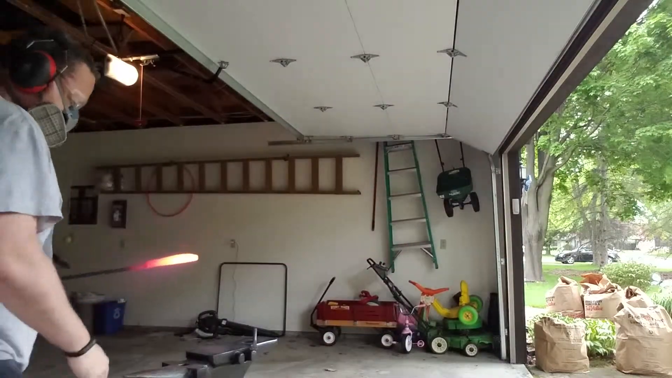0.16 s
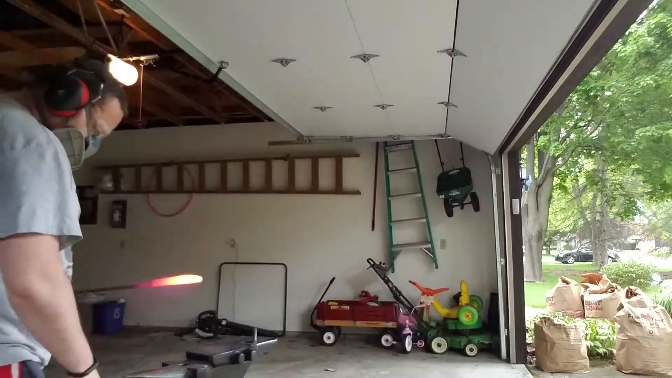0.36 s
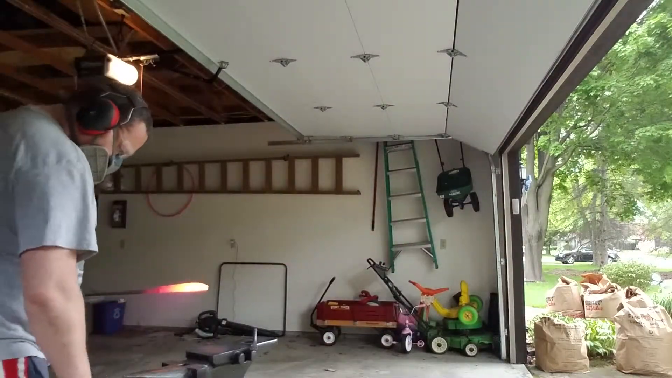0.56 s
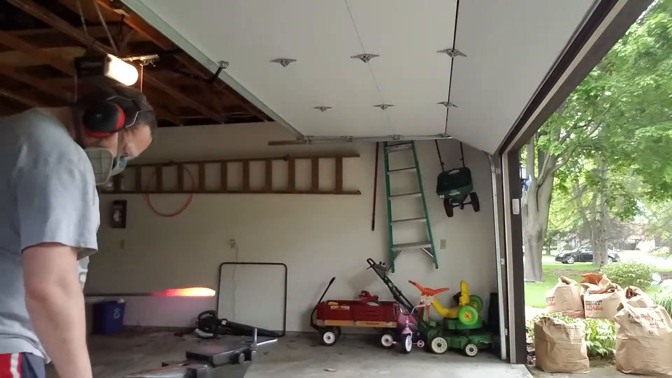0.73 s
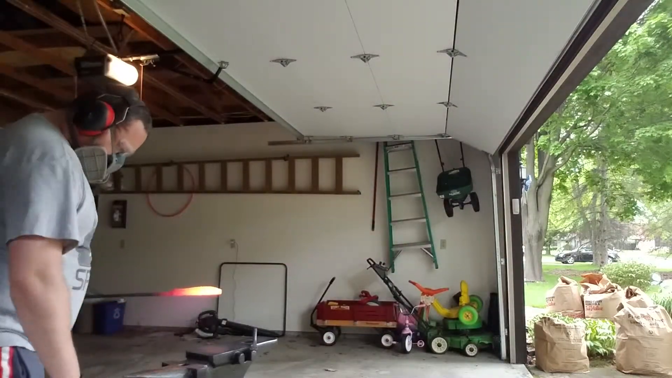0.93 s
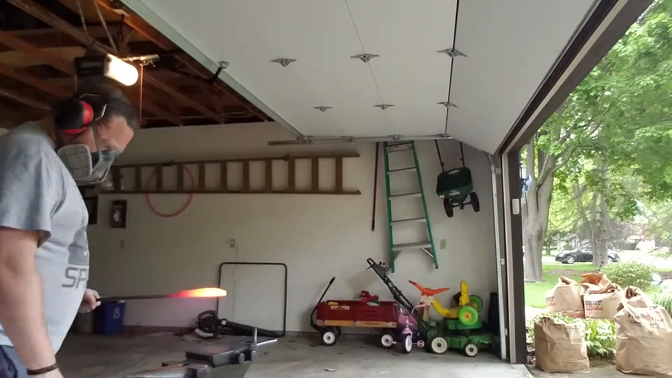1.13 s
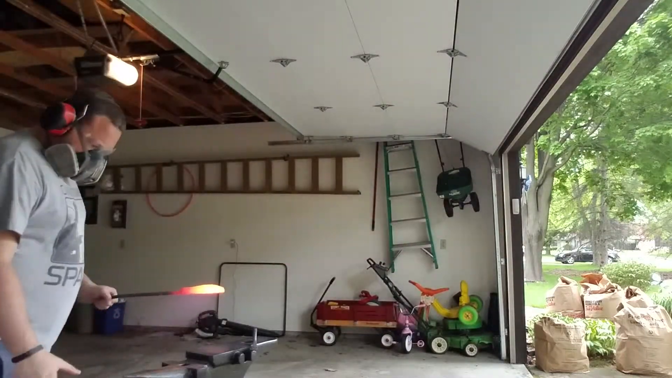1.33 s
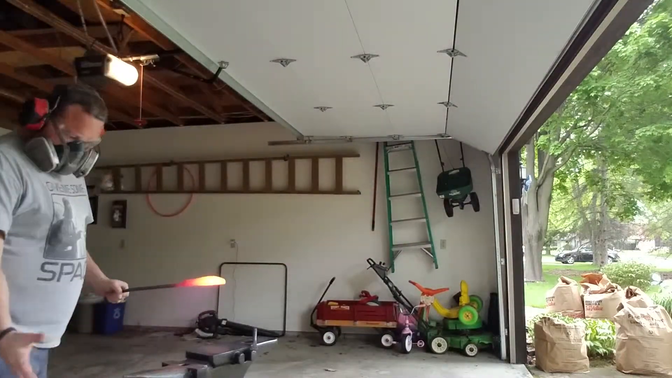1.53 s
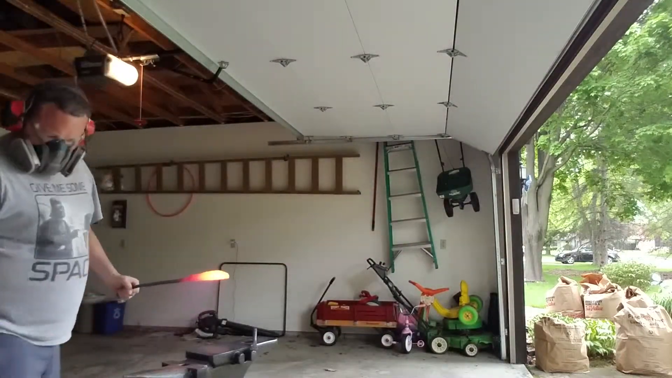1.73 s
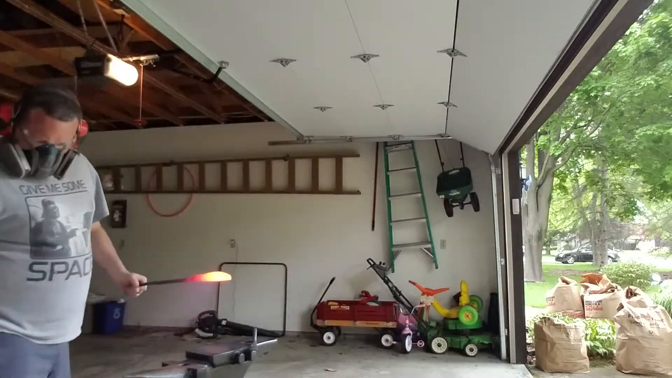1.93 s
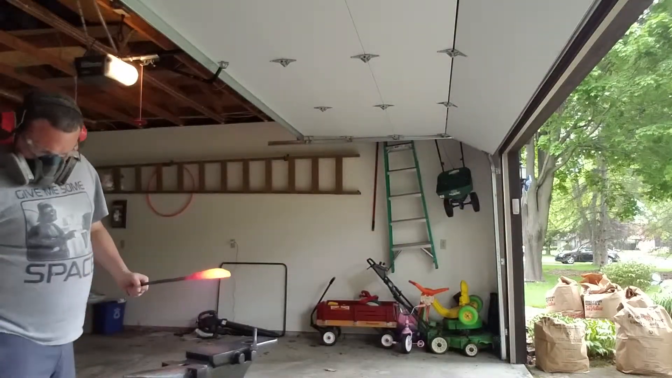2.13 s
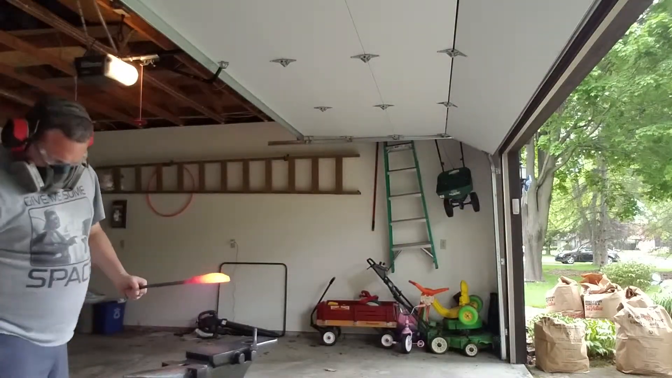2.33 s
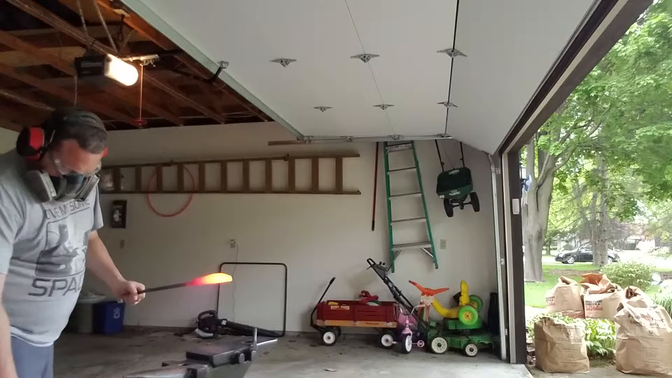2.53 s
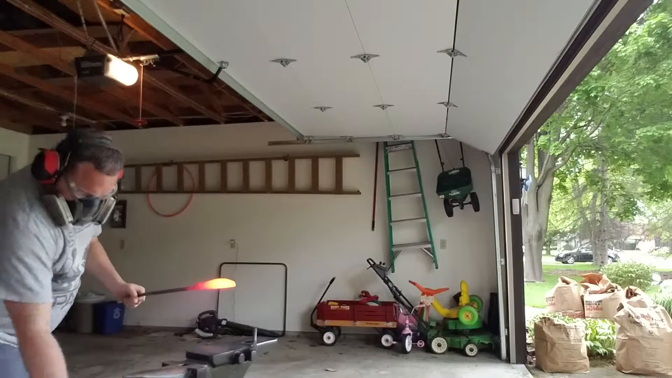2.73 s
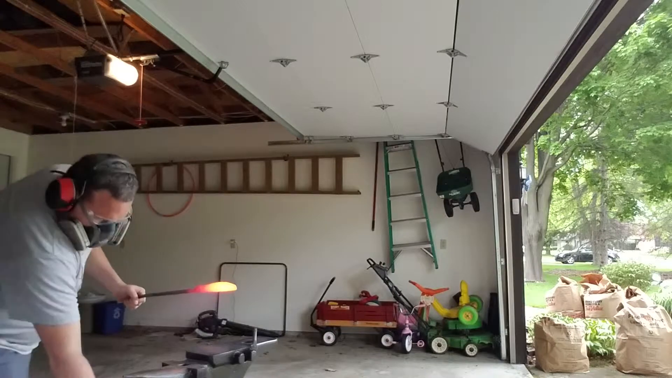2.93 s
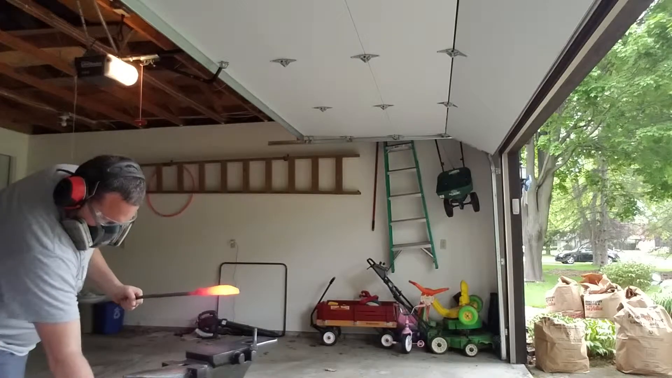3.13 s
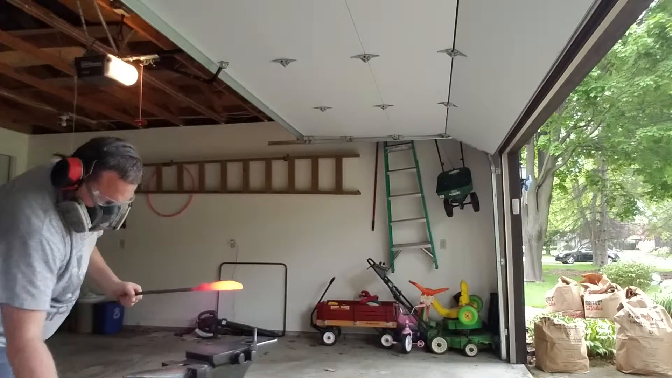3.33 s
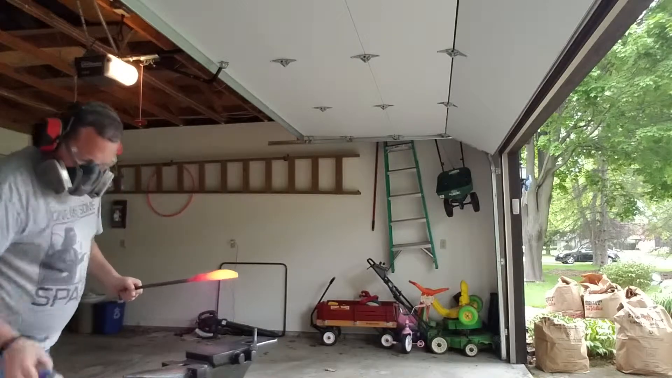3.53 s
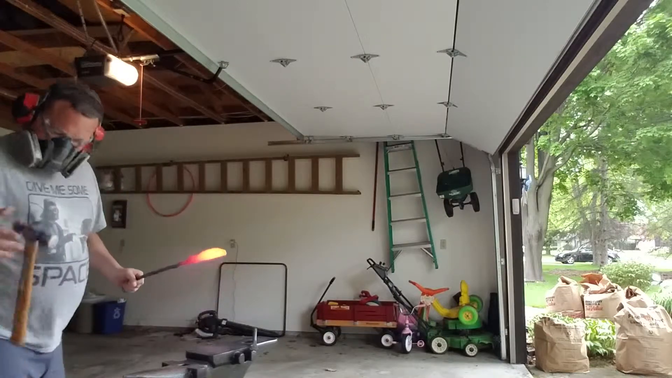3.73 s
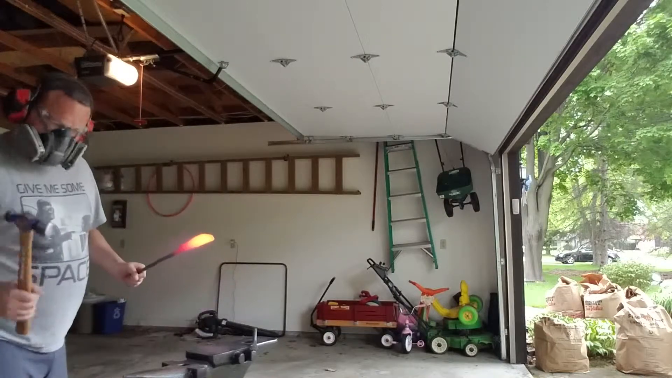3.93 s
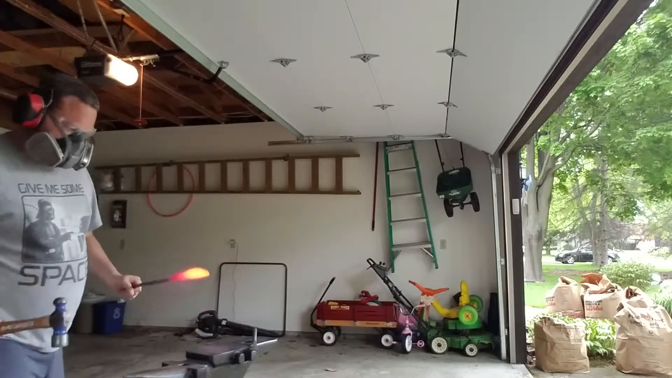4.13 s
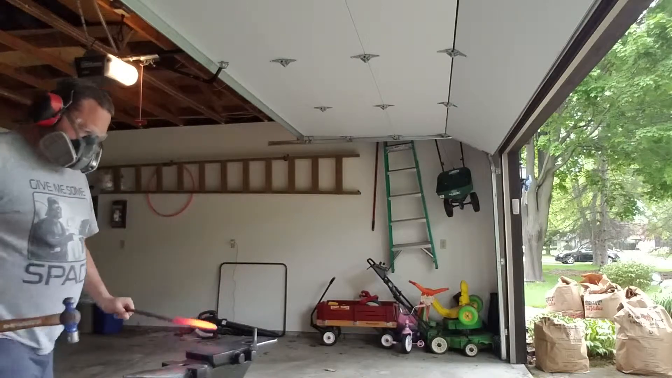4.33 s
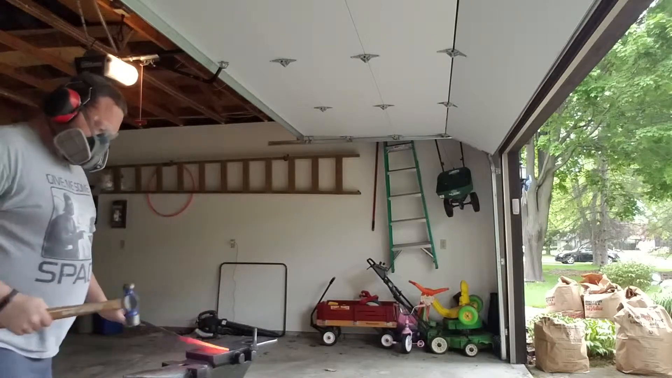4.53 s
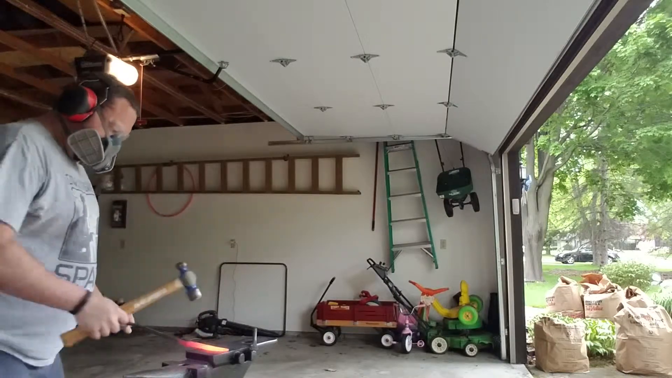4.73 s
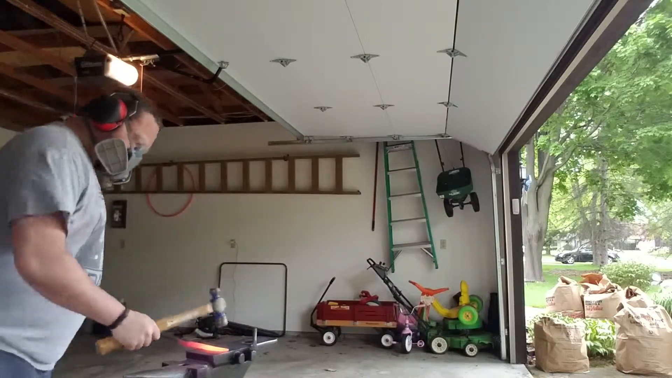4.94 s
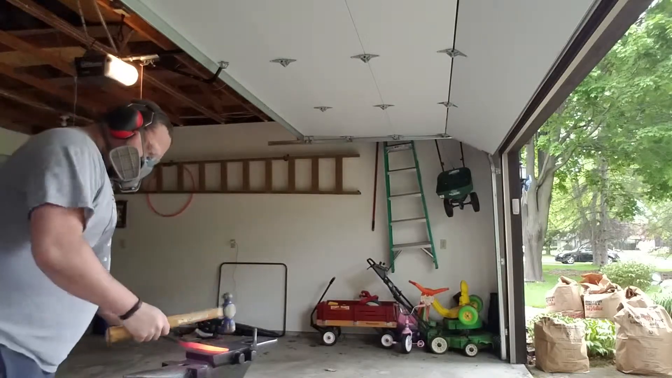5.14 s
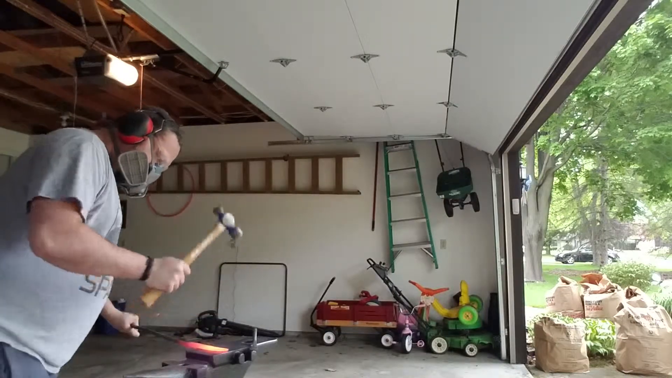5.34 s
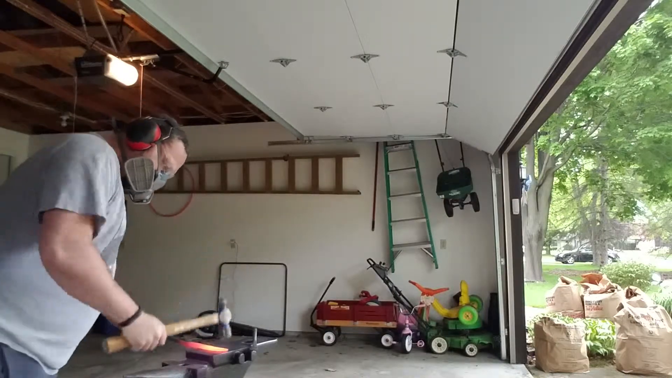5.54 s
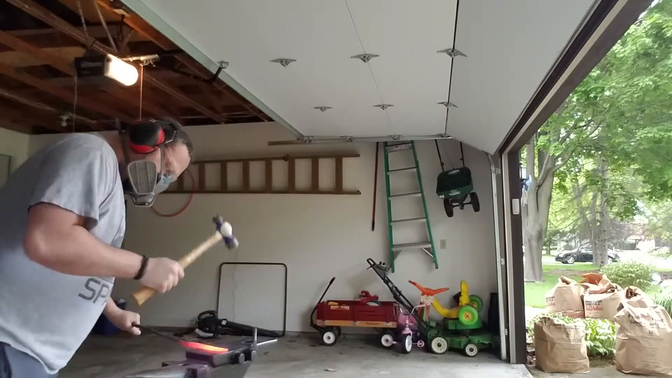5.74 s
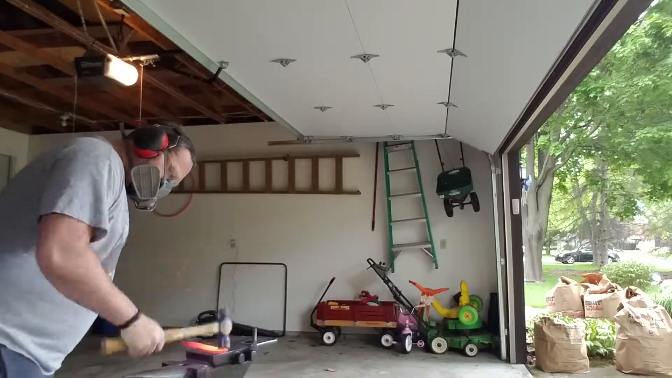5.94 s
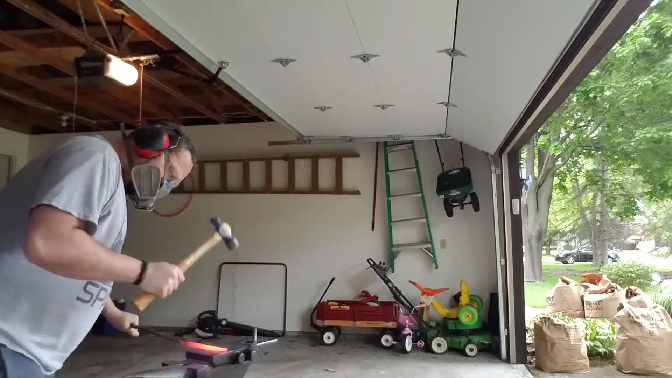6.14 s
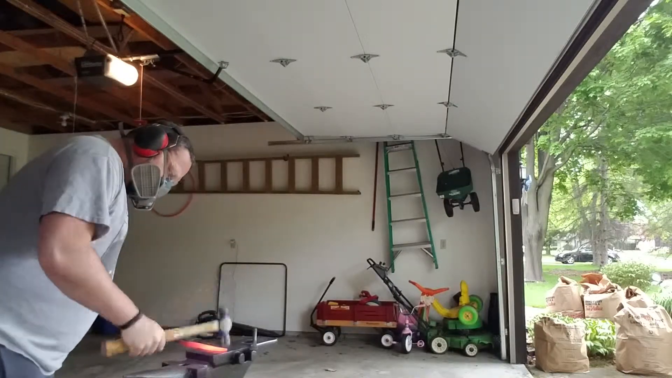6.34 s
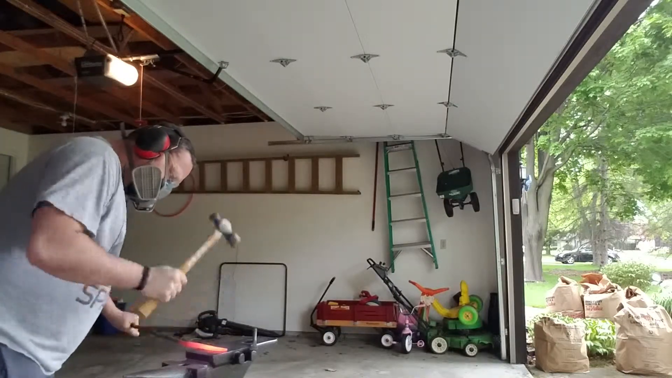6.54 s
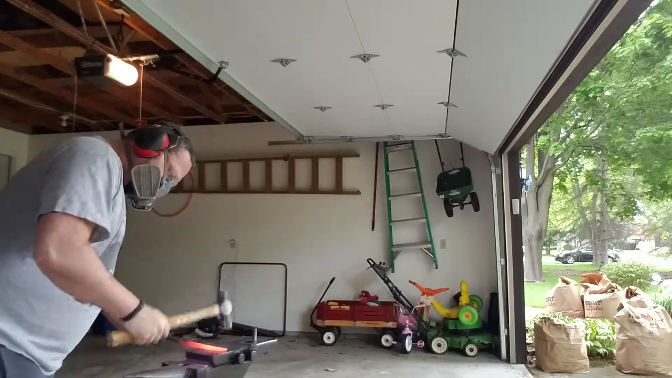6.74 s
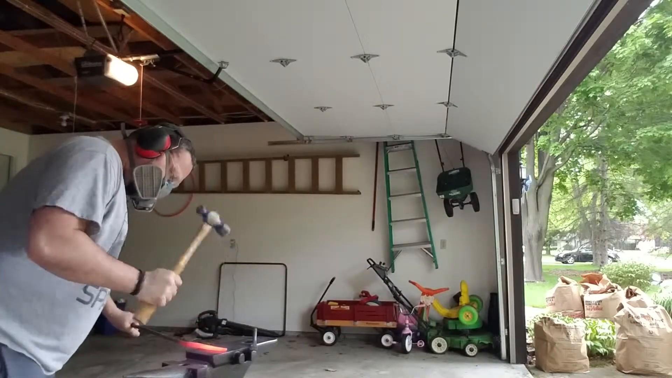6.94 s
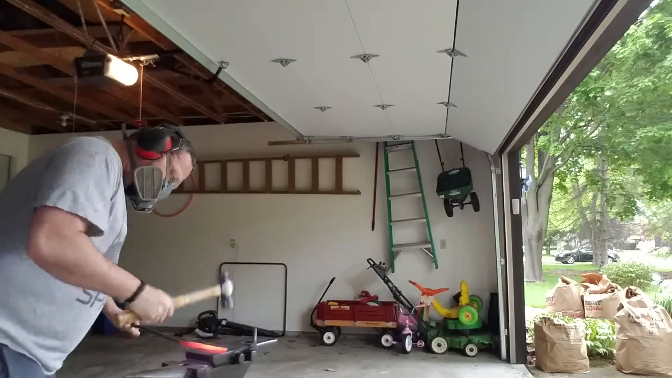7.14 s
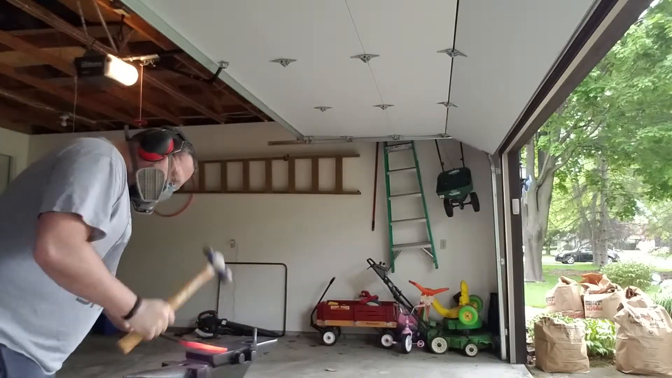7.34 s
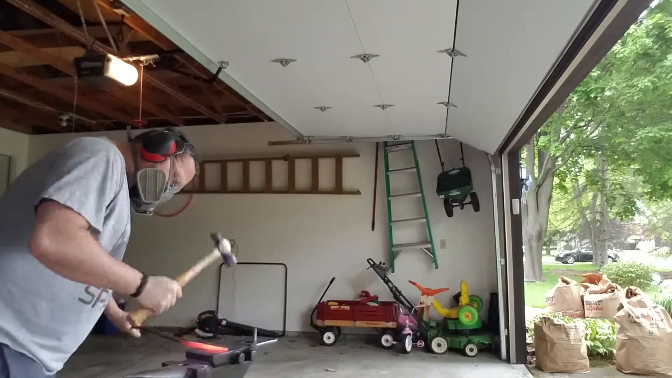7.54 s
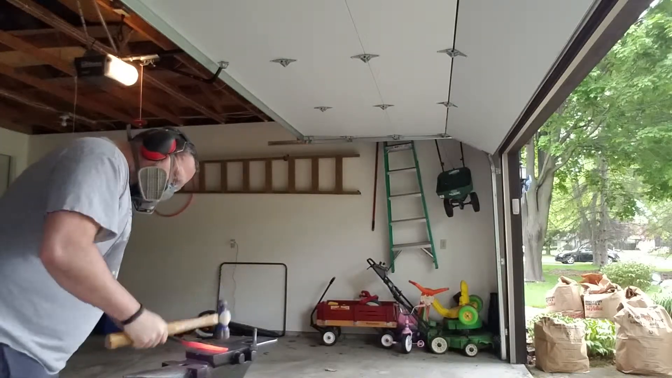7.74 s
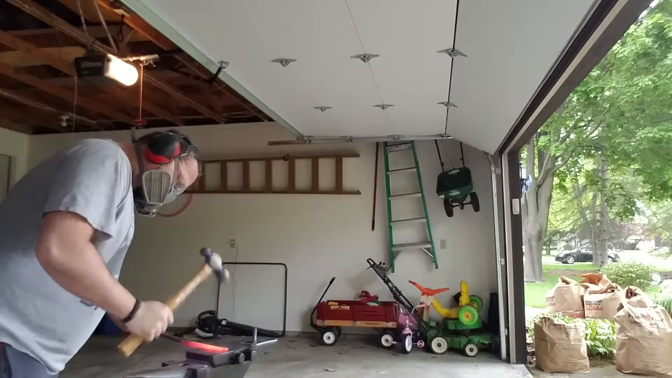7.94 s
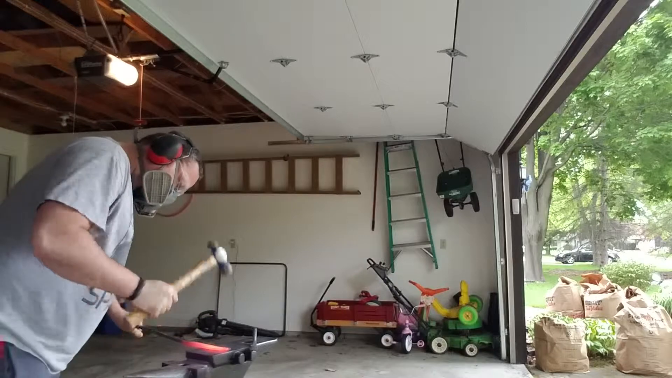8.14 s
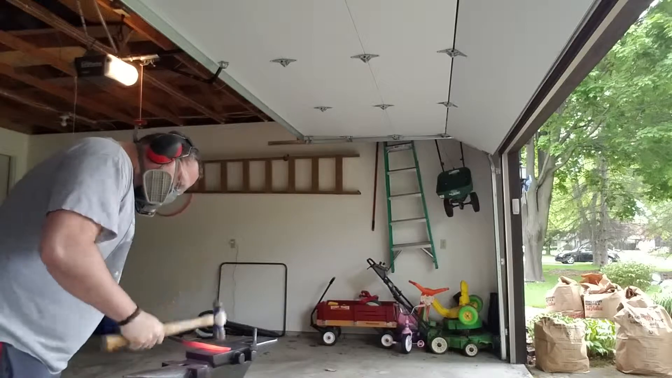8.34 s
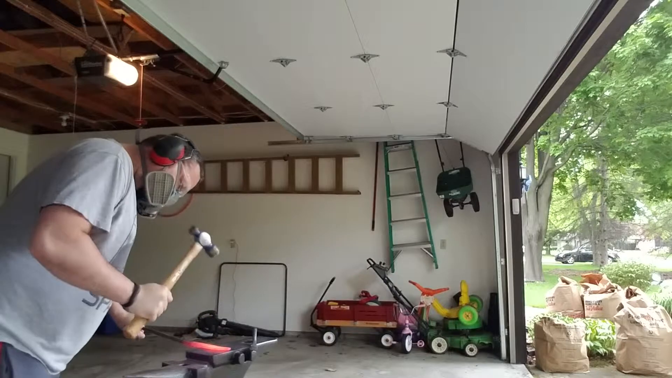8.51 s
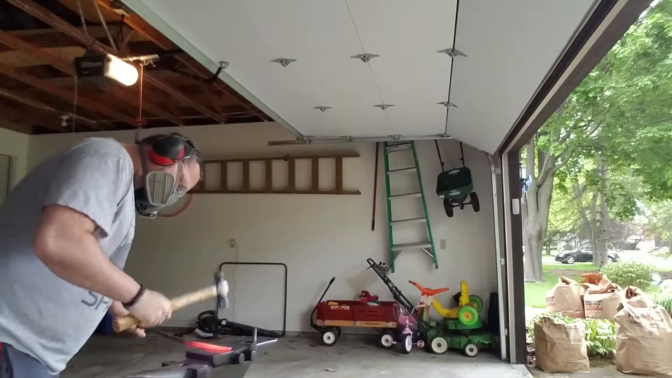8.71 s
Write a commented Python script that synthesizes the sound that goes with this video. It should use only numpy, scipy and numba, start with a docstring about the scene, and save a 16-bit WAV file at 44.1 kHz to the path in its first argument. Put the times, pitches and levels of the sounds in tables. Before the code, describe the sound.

In an open garage a gas forge roars constantly, a low booming flame with faint jet hiss. A few faint bird whistles and gritty shoe scuffs come first, then a dull clunk as a hammer is lifted and light steel ticks. Ten cracking, ringing hammer blows on a hot bar follow, close and very loud, pushing the roar down in level.

```python
"""A propane forge roars in an open garage: shaped noise, a booming flame over the hiss of its gas jet.
Ten hammer blows on a hot bar crack as noise and ring the anvil, its stand and the room as struck modes.
Before them the smith shuffles on the concrete in gritty hiss and picks up the hammer with a clunk.
A bird outside gives a few faint, falling sine whistles.
A gain control ducks fast when the blows get too loud and lets the roar back up slowly."""
import sys
import numpy as np
from scipy import signal
from scipy.fft import rfft, irfft, next_fast_len
from scipy.io import wavfile
from scipy.ndimage import minimum_filter1d, map_coordinates
from numba import njit

SR = 44100
rng = np.random.default_rng(int(sys.argv[2]) if len(sys.argv) > 2 else 0)


def to_wav(s):
    """Save 16-bit WAV."""
    ch = np.atleast_2d(s).T  # columns
    pcm = np.round(np.clip(ch, -1, 1) * 32767)  # PCM
    wavfile.write(sys.argv[1], SR, pcm.astype(np.int16))


N = 391148
TIME = np.arange(N) / SR  # s
RING = TIME[:20480]  # s, the time axis of every short sound

# Colour of the flame's roar. Each row: frequency in Hz, relative density in dB per Hz.
FLAME_COLOUR = [(20, -43), (50, -24.5), (100, -10.5), (200, -6.5), (330, 1.5), (420, -2), (640, -19),
                (870, -20), (1400, -25), (1900, -48), (3500, -80)]
# Resonances of forge chamber and garage. Each row: centre in Hz, width in Hz, lift in dB.
CHAMBER_RESONANCES = [(58.7, 8, 13.5), (77, 9, 11), (114.5, 9.3, -9), (174.1, 21.8, 11), (255, 9.3, 9),
                      (322.5, 14, 7), (364, 4.2, 7.5), (538, 9.1, 6)]
# Colour of the gas jet's hiss. Each row: frequency in Hz, relative density in dB per Hz.
JET_COLOUR = [(1000, -56), (1700, -2), (2050, -3.5), (2360, -3), (2540, -4.5), (3040, -5.5), (4770, -14.5),
              (5140, -13.5), (7700, -25.5), (13400, -16.5), (14600, -18), (16000, -18.5)]
# Resonances of burner tube and nozzle. Each row: centre in Hz, width in Hz, lift in dB.
BURNER_RESONANCES = [(2390, 76, 5.5), (14500, 700, 0)]
# Stereo lean of the forge. Each row: frequency in Hz, left minus right in dB.
FORGE_LEAN = [(60, 3), (110, -4.5), (200, -2), (380, -4.5), (700, 0.5), (1290, 3.5), (2380, -2.5),
              (4400, -0.5), (8120, -2), (15000, -10)]
FLAME_DB, JET_DB = -18, -45.5  # rms levels, before flutter
FLARE_AT_S, FLARE_S, FLARE_DB = 0.32, 0.33, 1.3  # the flame swells once: its middle, half length and lift

# Hammer blows. Each row: start in seconds, force in dB, relative hardness in dB
# (how much of the blow gets through the soft bar to the anvil's high modes).
HAMMER_BLOWS = [(5.526, -0.5, 0.5), (5.958, -1, -0.5), (6.354, -0.5, 2), (6.717, -0.5, 1.5),
                (7.063, -2, -4), (7.403, 0, 1.5), (7.722, -4.5, -19), (8.020, -3, -4.5), (8.334, -2, -13.5),
                (8.640, -2, -9.5)]
# Modes of anvil, bar and hammer head. Each row: frequency in Hz, width in Hz, relative level in dB.
ANVIL_MODES = [(1025, 60, -14), (1103, 50, -12), (1578, 18, -5), (1830, 12, 0), (2072, 15, -6),
               (2729, 20, 1), (2793, 25, -4), (3526, 15, -1), (3595, 35, -6), (5319, 12, -18),
               (5631, 10, -19), (5790, 30, -9), (6024, 8, -10), (6105, 20, -12), (7138, 40, -22),
               (7690, 15, -20), (7860, 15, -14), (8064, 50, -15), (9055, 20, -27), (9943, 6, -12),
               (10540, 6, -22), (11740, 8, -21), (13010, 6, -19), (13290, 6, -20), (13890, 30, -20),
               (15420, 12, -26)]
# How modes follow the hardness of a blow. Each row: frequency in Hz, share from 0 to 1.
HARDNESS_SHARE = [(2000, 0.06), (2700, 0.64), (3600, 0.53), (5800, 1), (8000, 1), (9900, 0)]
# Crack of hammer on bar. Each row: frequency in Hz, relative density in dB per Hz.
CRACK_COLOUR = [(30, -34.5), (60, -14), (300, -9), (640, -15), (1000, 1.5), (1400, -4), (2600, -2.5),
                (4200, -8), (5600, -16), (6700, -19), (7900, -18.5), (8800, -24), (9800, -17.5),
                (11200, -13.5), (16000, -15.5)]
# Modes of the anvil's stand. Each row: frequency in Hz, width in Hz, relative level in dB.
STAND_MODES = [(50.6, 6, -4), (66.4, 8, -1), (105.5, 28, -1)]
# Floor and walls throw the clank and tink of a blow back. Each row: delay in seconds, level in dB.
SLAP_ECHOES = [(.0038, 2), (.033, -5), (.071, -5)]

# The hammer is lifted and knocks twice. Each row: start in seconds, relative level in dB.
HAMMER_CLUNKS = [(3.124, -4), (3.158, -16)]
# Modes of the hammer and what it knocks against. Each row: frequency in Hz, width in Hz, relative level in dB.
HAMMER_MODES = [(723, 25, -2), (811, 91, 6), (976, 50, 0), (1435, 130, -0.5), (1630, 67, -10),
                (2330, 53, -0.5), (2750, 49, -3.5), (3490, 56, -9), (3970, 80, -15)]
# Noise of the hammer's knock. Each row: frequency in Hz, relative density in dB per Hz.
KNOCK_COLOUR = [(300, -38), (600, -7.5), (830, 6.5), (1150, -5), (1550, -7), (1950, -25), (2700, -28),
                (4200, -33), (7000, -50), (16000, -69)]
# Light touches of steel. Each row: start in seconds, level in dB before the garage answers.
STEEL_TICKS = [(.41, -38.5), (0.452, -35.5), (1.81, -44), (2.687, -44), (4.501, -39), (4.555, -27.5)]
# Noise of a light touch. Each row: frequency in Hz, relative density in dB per Hz.
TICK_COLOUR = [(1200, -23), (2600, 6.5), (4200, 2), (6200, -5.5), (8500, -20), (12000, -14), (16000, -22)]

# Soles drag over the concrete. Each row: middle in seconds, length in seconds,
# level in dB before the stroke shapes it.
SOLE_SCUFFS = [(0.316, 0.19, -53), (1.37, 0.36, -33), (1.819, 0.16, -50), (2.525, .22, -41),
               (4.451, 0.11, -40)]
# Colour of the grit under the sole. Each row: frequency in Hz, relative density in dB per Hz.
GRIT_COLOUR = [(900, -17), (2400, 1), (3600, -0.5), (6200, -1.5), (8000, -8), (11500, 2), (16000, -0.5)]
LIGHT_SCUFF_DB, DULLING = -49, 0.19  # a heavier drag is duller: dB per octave for each dB above a light one

# Bird calls. Each row: start in seconds, starting pitch in Hz, level in dB before the garage answers.
BIRD_CHIRPS = [(.52, 11250, -58), (.54, 5270, -59), (.67, 5200, -54), (0.886, 5150, -52)]
CHIRP_S, SAG_HZ_PER_S = .068, 2400  # every chirp is this long and slides down

# Decay of the garage. Each row: frequency in Hz, time to fall 60 dB in seconds.
GARAGE_DECAY = [(100, 0.68), (1000, 0.48), (3000, 0.46), (7000, 0.42), (14000, 0.27)]
# Left-right likeness of noise in the garage. Each row: frequency in Hz, correlation.
EAR_LIKENESS = [(60, 0.79), (130, 1), (290, 0.71), (640, 0.86), (1400, 0.1), (15000, .05)]
TOP_HZ = 15900  # the steep upper band limit


def forge(flutter_db=0.2, lag_s=0.00028):
    """Turbulent flame booming in its chamber over the hiss of the gas jet, reaching the right ear first."""
    flame = unit(coloured(N, lambda hz: along(FLAME_COLOUR, hz) + humps(CHAMBER_RESONANCES, hz)))
    flare_db = FLARE_DB * np.exp(-((TIME - FLARE_AT_S) / FLARE_S) ** 2)
    flame = flame * amp(FLAME_DB + flare_db + flutter_db * wobble(rate=12))
    jet = unit(coloured(N, lambda hz: along(JET_COLOUR, hz) + humps(BURNER_RESONANCES, hz)))
    jet = jet * amp(JET_DB + 0.26 * wobble(rate=8.7))
    ears = np.array([[1], [-1]]) / 2  # half of each stereo difference goes to each ear

    def placement(hz):
        """Level and arrival time of the forge at each ear."""
        return amp(ears * along(FORGE_LEAN, hz)) * np.exp(-2j * np.pi * hz * lag_s * ears)

    return filtered(flame + jet, placement)


def hammering(ring_db=-6.0, treble_db=1.0, crack_db=1.4, thud_db=-25,
              clank_db=-3, clank_hz=1060, clank_t60=0.029, tink_db=-13, tink_t60=0.043):
    """Each blow cracks, rings the anvil and shakes its stand; a cushioned blow leaves the high modes quieter."""
    track = np.zeros((2, N))
    mode_hz, _, mode_db = np.transpose(ANVIL_MODES)
    share = along(HARDNESS_SHARE, mode_hz)
    tones = np.sin(2 * np.pi * mode_hz[:, None] * RING)
    for s, force_db, hard_db in HAMMER_BLOWS:
        lift_db = share * (hard_db + treble_db)
        steel = amp(ring_db) * ring(ANVIL_MODES, scatter_db=0.64, lift_db=lift_db, loss=0.0017)
        crack = amp(crack_db) * garage(burst(CRACK_COLOUR, t60=0.068), wet_db=6.0)
        thud = amp(thud_db) * ring(STAND_MODES, scatter_db=0.5).mean(0)
        # the bar, squeezed between hammer and anvil, gives a short dead clank
        clank = amp(clank_db - 60 * RING / clank_t60) * np.sin(2 * np.pi * clank_hz * RING)
        # the modes also arrive straight from the anvil, as a clean tink
        tink = amp(tink_db - 60 * RING / tink_t60) * (amp(mode_db + lift_db) @ tones)
        blow = steel + crack + thud + slapped(clank + tink)
        add(track, s, amp(force_db) * blow)
    return track


def handling(ring_db=-22, knock_db=-3):
    """The hammer clunks as it is picked up, damped by the hand; steel touches steel lightly."""
    track = np.zeros((2, N))
    soft = 1 - np.exp(-(RING / .001) ** 2)  # a gentle contact takes about a millisecond to build up
    for s, db in HAMMER_CLUNKS:
        body = amp(ring_db) * ring(HAMMER_MODES, scatter_db=1, loss=.04)
        knock = amp(knock_db) * garage(soft * burst(KNOCK_COLOUR, t60=0.088), wet_db=-4.0)
        add(track, s, amp(db) * (soft * body + knock))
    for s, db in STEEL_TICKS:
        add(track, s, amp(db) * garage(burst(TICK_COLOUR, t60=0.043), wet_db=-2))
    return track


def shuffling(grain_db=0.6, pivot_hz=6000):
    """Each drag of a sole swells and fades as a gritty hiss, duller the heavier it is."""
    track = np.zeros((2, N))
    for s, length, db in SOLE_SCUFFS:
        tilt = DULLING * (LIGHT_SCUFF_DB - db)  # dB per octave
        hiss = unit(coloured(len(RING), lambda hz: along(GRIT_COLOUR, hz) + tilt * np.log2((hz + 1) / pivot_hz)))
        stroke = np.sin(np.pi * np.minimum(RING / length, 1)) ** 2
        add(track, s - length / 2, amp(db) * garage(hiss * stroke, wet_db=-14.0))
    return track * amp(grain_db * wobble(rate=140))


def bird():
    """Thin, falling sine whistles that come in through the open door."""
    track = np.zeros((2, N))
    swell = np.sin(np.pi * np.minimum(RING / CHIRP_S, 1))
    for s, start_hz, db in BIRD_CHIRPS:
        phase = 2 * np.pi * np.cumsum(start_hz - SAG_HZ_PER_S * RING) / SR
        whistle = swell * np.sin(phase)
        add(track, s, amp(db) * garage(whistle[None], wet_db=0))
    return track


def ring(modes, scatter_db, lift_db=0, loss=0, common=0.43):
    """Struck modes heard through the garage: echoes make each one beat and waver, differently at each ear."""
    hz, width, db = np.transpose(modes)
    offset = np.fft.fftfreq(len(RING), 1 / SR) / width[:, None]
    # each mode is a narrow band of echoes around its frequency
    band = 1 / np.sqrt((1 + (2 * offset) ** 2) * (1 + (offset / 4) ** 2))
    random_phase = np.exp(2j * np.pi * rng.random((3,) + band.shape))
    both, left, right = np.fft.ifft(band * random_phase)
    waver = np.array([left, right]) + common * both
    carrier = np.exp(2j * np.pi * hz[:, None] * RING)
    decay = fade(hz, RING) * amp(-loss * hz[:, None] * RING)  # loss in dB a cycle: high modes die sooner
    waves = (waver * carrier).real * decay
    # give every mode the energy of its plain decay
    waves *= np.linalg.norm(decay, axis=1, keepdims=True) / np.linalg.norm(waves, axis=2, keepdims=True)
    size = amp(db + lift_db + scatter_db * rng.standard_normal(len(hz)))
    return (size[:, None] * waves).sum(1)


def burst(spectrum, t60):
    """The short noisy crack of a contact, falling 60 dB in t60 seconds."""
    return unit(coloured(len(RING), lambda hz: along(spectrum, hz))) * amp(-60 * RING / t60)


def slapped(x):
    """A contact followed by its distinct echoes."""
    def response(hz):
        """The direct sound plus each delayed copy."""
        return 1 + sum(amp(db) * np.exp(-2j * np.pi * hz * delay) for delay, db in SLAP_ECHOES)

    return filtered(x, response)


def garage(x, wet_db):
    """A sound plus the garage's diffuse answer: noise that dies away band by band."""
    hz, t, z = signal.stft(diffuse(len(RING)), SR, nperseg=256)
    tail = signal.istft(z * fade(hz, t), SR, nperseg=256)[1][:, :len(RING)]
    tail = tail / np.linalg.norm(tail[0])
    return x + amp(wet_db) * signal.fftconvolve(x, tail, axes=1)[:, :len(RING)]


def fade(hz, t, linger_s=0.023):
    """Sound in the garage lingers while the first echoes pile up, then dies, the treble soonest."""
    return amp(-60 * (np.hypot(t, linger_s) - linger_s) / along(GARAGE_DECAY, hz)[:, None])


def diffuse(size):
    """Stereo white noise, much alike in the bass and nearly unrelated in the treble."""
    def mid_side(hz):
        """Shares of mid and side that give the wanted likeness."""
        turn = np.arccos(np.clip(along(EAR_LIKENESS, hz), -1, 1)) / 2
        return np.array([np.cos(turn), np.sin(turn)])

    mid, side = filtered(rng.standard_normal((2, size)), mid_side)
    return np.array([mid + side, mid - side])


def coloured(size, colour_db):
    """Diffuse noise shaped by a curve in dB."""
    return filtered(diffuse(size), lambda hz: amp(colour_db(hz)))


def humps(peaks, hz):
    """The lift in dB that (Hz, width, dB) resonances give to a spectrum."""
    return sum(db / (1 + (2 * (hz - centre) / width) ** 2) for centre, width, db in peaks)


def wobble(rate):
    """A smooth random curve, rate knots a second."""
    return map_coordinates(rng.standard_normal(int(N * rate / SR) + 4), [TIME * rate])


def amp(db):
    """Decibels to gain."""
    return 10 ** (np.asarray(db) / 20)


def unit(x):
    """x at rms 1."""
    return x / np.sqrt(np.mean(x ** 2) + 1e-20)


def along(points, hz):
    """(Hz, value) points joined on a log axis."""
    f, v = np.transpose(points)
    return np.interp(np.log(hz + 1), np.log(f + 1), v)


def filtered(x, response):
    """x times a response of frequency, padded so that tails do not wrap round."""
    n = x.shape[-1]
    m = next_fast_len(n + SR // 4)
    return irfft(rfft(x, m) * response(np.fft.rfftfreq(m, 1 / SR)), m)[..., :n]


def add(track, s, sound):
    """Mix a sound into the track at time s."""
    part = track[:, round(s * SR):][:, :sound.shape[-1]]
    part += sound[..., :part.shape[-1]]


def scene():
    """Forge, bird, smith and anvil, the anvil slightly to the right."""
    anvil_pan = amp([[-.7], [.7]])  # dB left, right
    return forge() + bird() + shuffling() + handling() + hammering() * anvil_pan


@njit
def follow(wanted, attack, release):
    """Follow a curve, rising and falling with their own time constants (in samples)."""
    out, now = np.empty(len(wanted)), 0.
    for i in range(len(wanted)):
        now += (wanted[i] - now) / (attack if wanted[i] > now else release)
        out[i] = now
    return out


def record(dry, target_db=-1.0, attack_s=0.014, release_s=7):
    """A look-ahead gain control that ducks fast and recovers slowly, soft clipping, and the band limit."""
    peak = -minimum_filter1d(-abs(dry).max(0), size=620)  # the window reaches 7 ms ahead
    excess_db = np.maximum(20 * np.log10(peak + 1e-9) - target_db, 0)
    ducked = dry * amp(-follow(excess_db, attack_s * SR, release_s * SR))
    clipped = ducked / (1 + ducked ** 6) ** (1 / 6)
    return filtered(clipped, lambda hz: 1 / (1 + (hz / TOP_HZ) ** 150))


dry = scene()
out = record(dry)
to_wav(out)
```